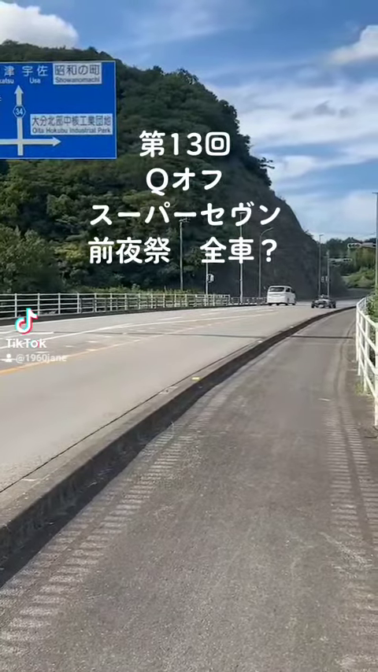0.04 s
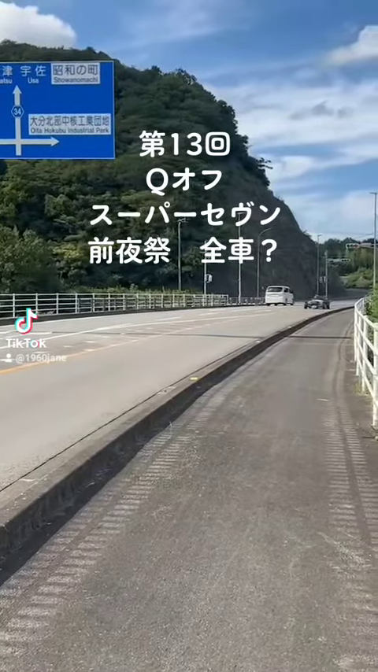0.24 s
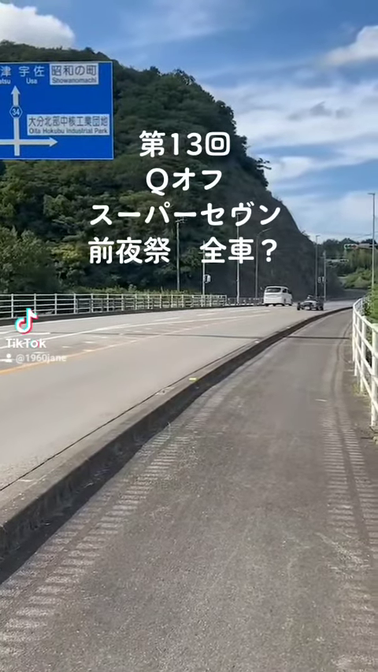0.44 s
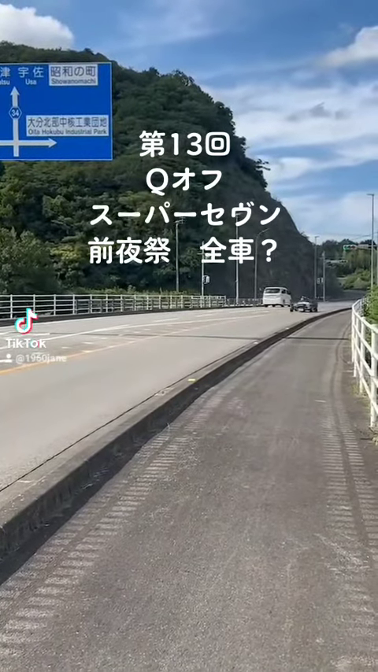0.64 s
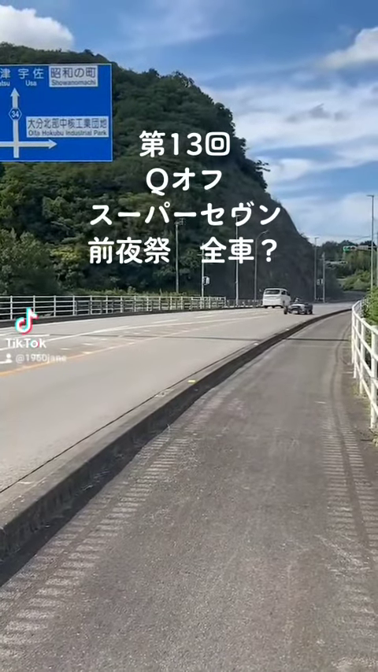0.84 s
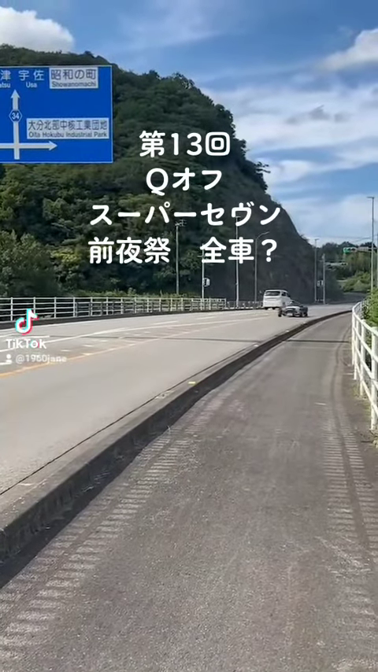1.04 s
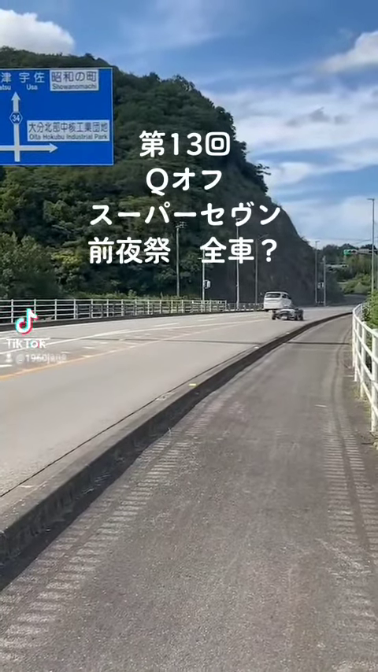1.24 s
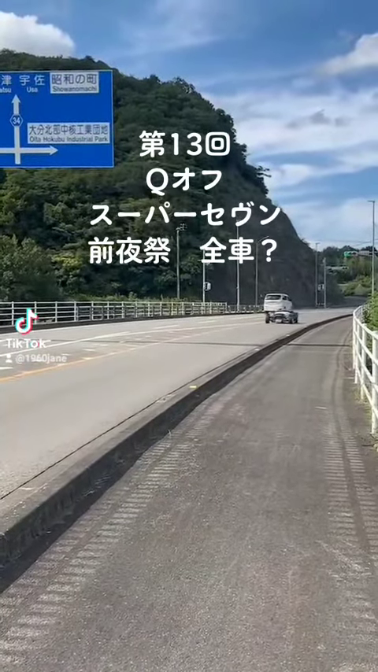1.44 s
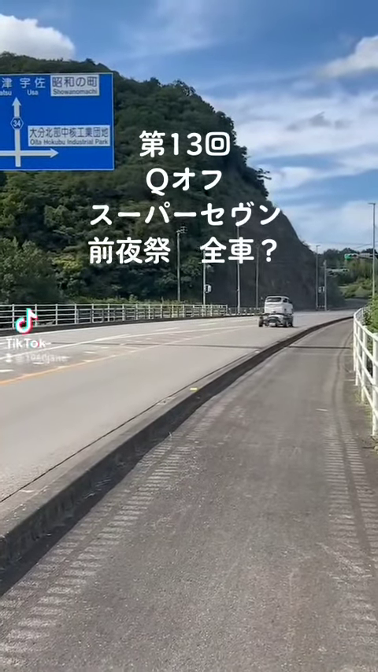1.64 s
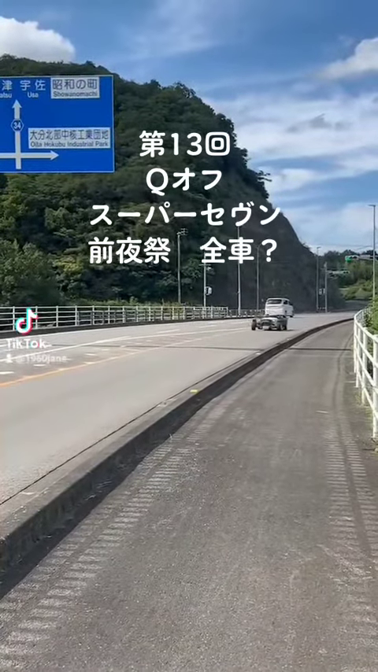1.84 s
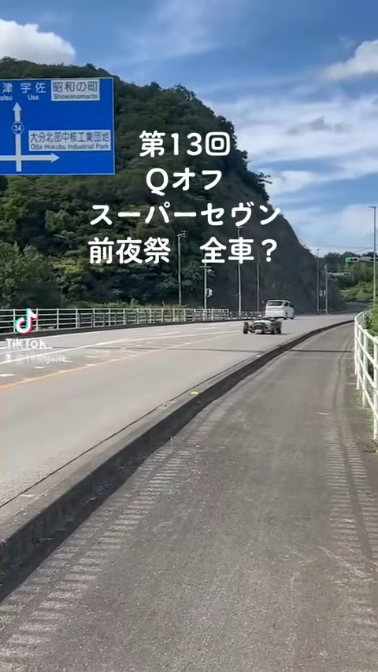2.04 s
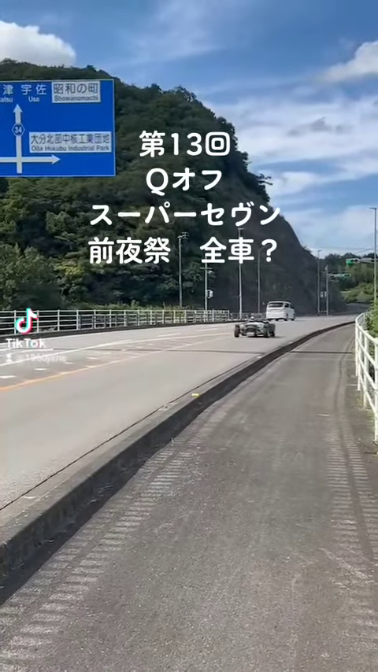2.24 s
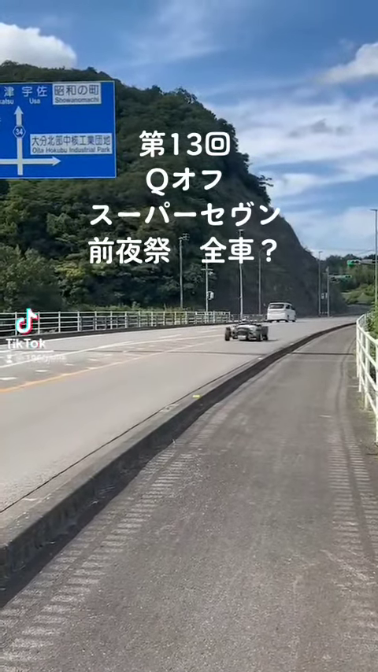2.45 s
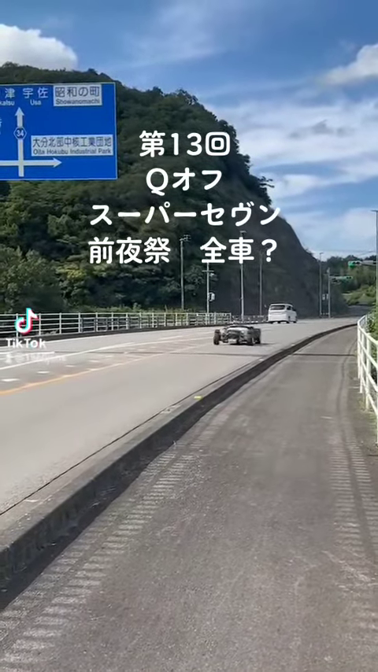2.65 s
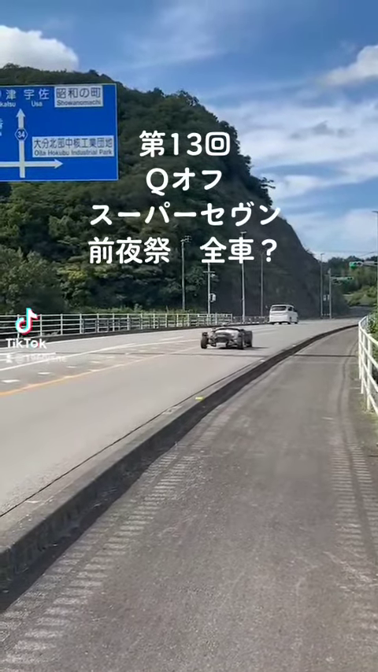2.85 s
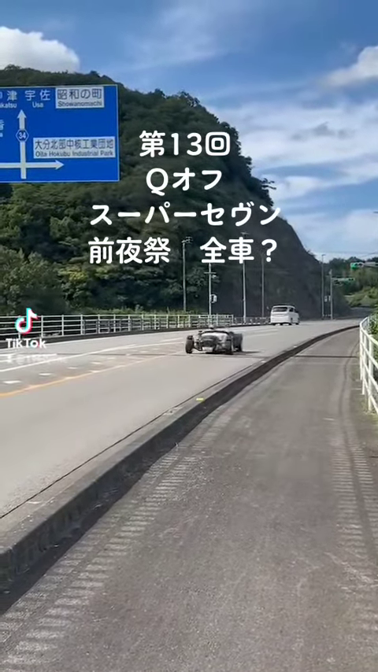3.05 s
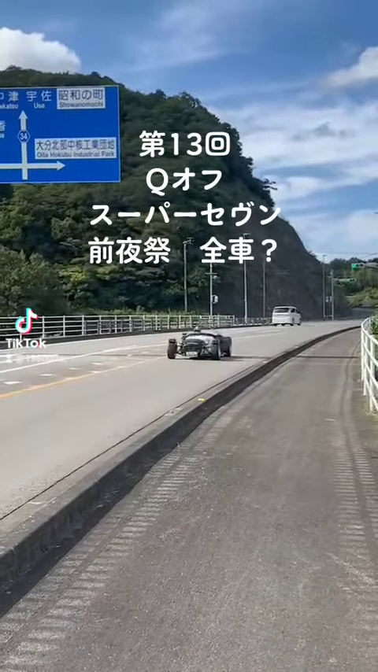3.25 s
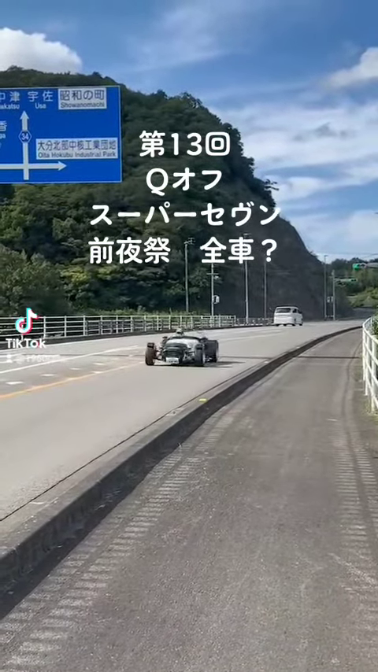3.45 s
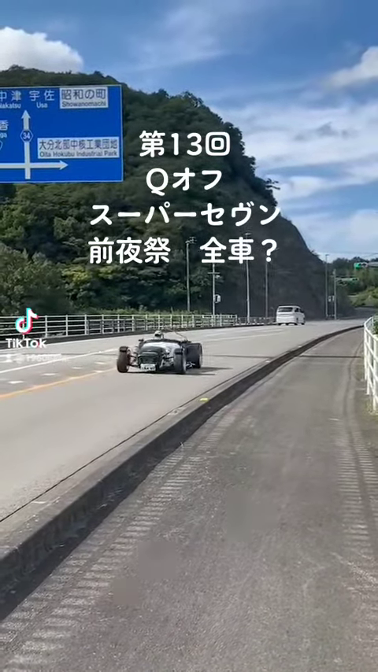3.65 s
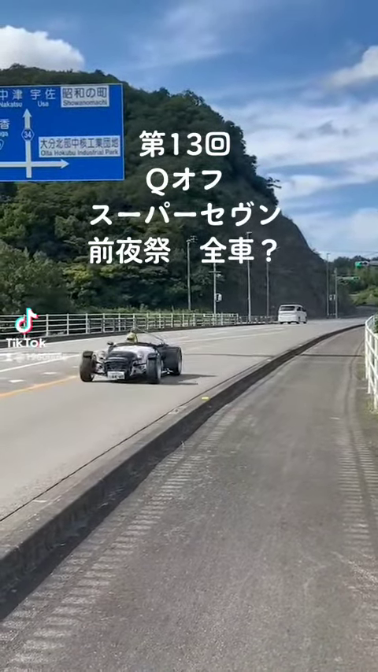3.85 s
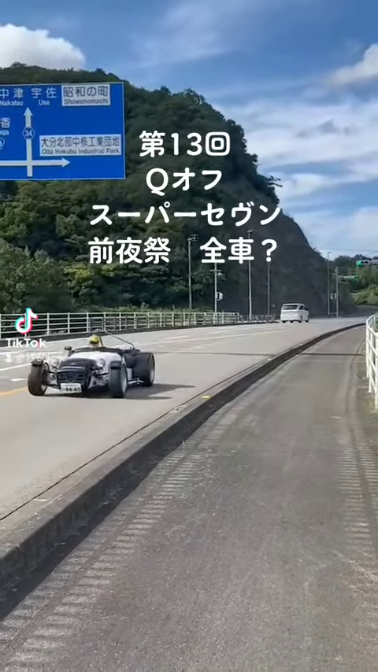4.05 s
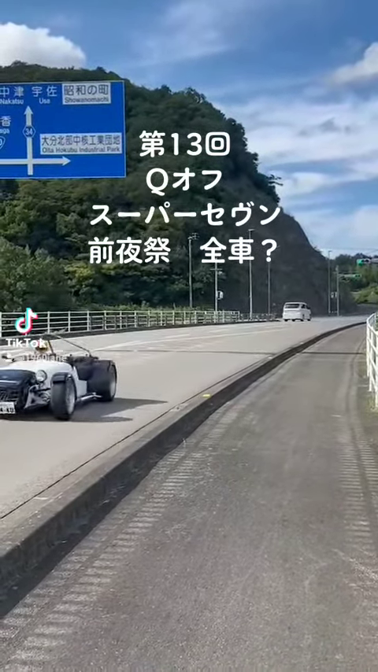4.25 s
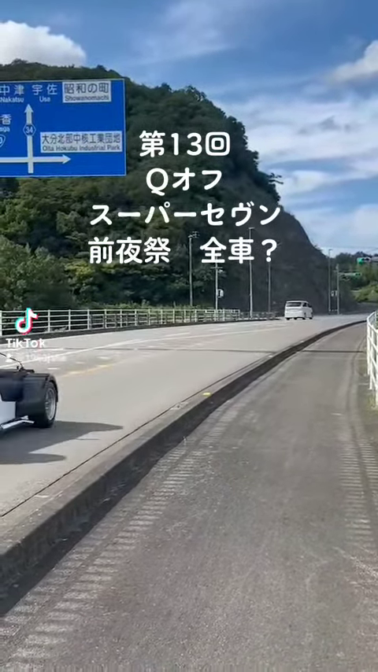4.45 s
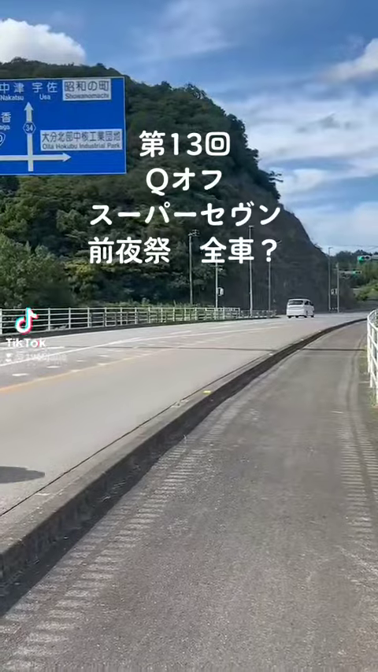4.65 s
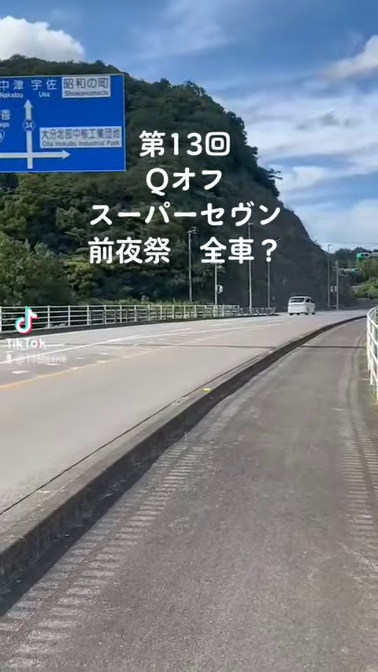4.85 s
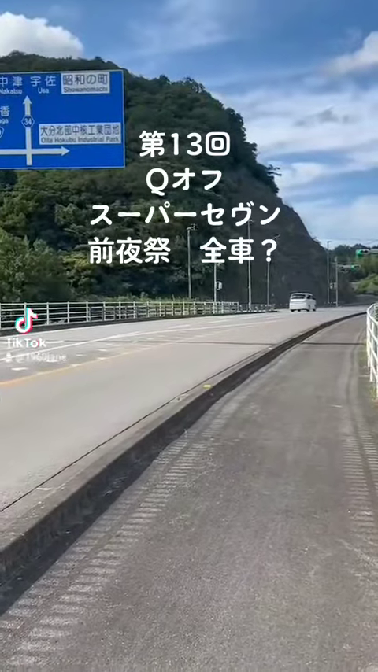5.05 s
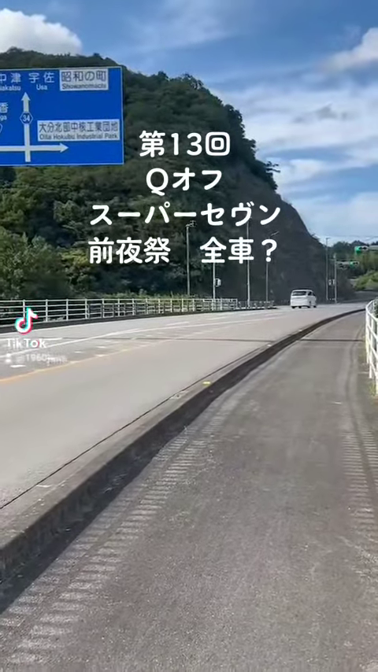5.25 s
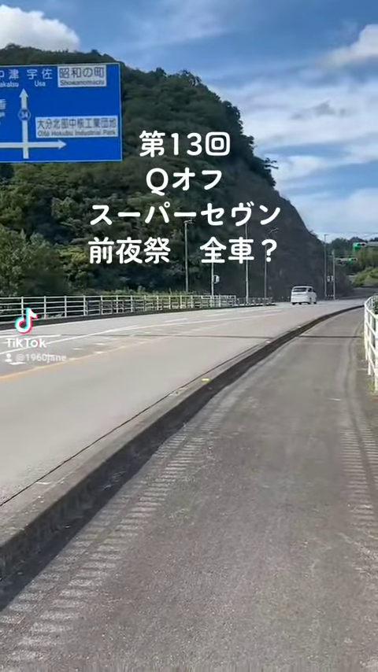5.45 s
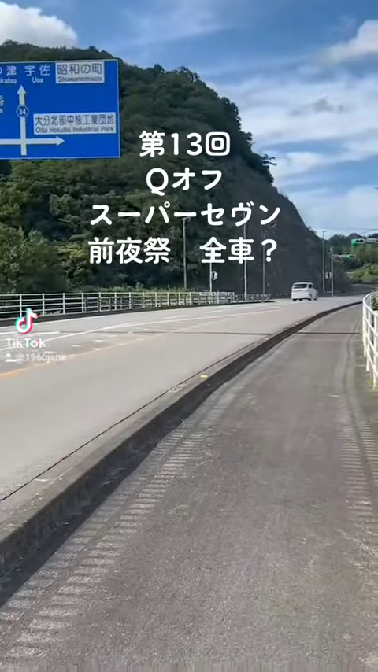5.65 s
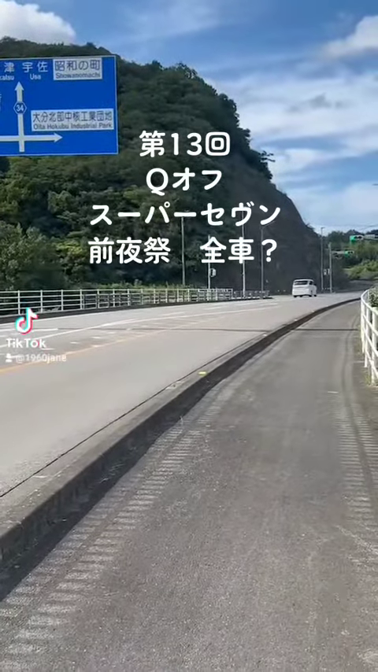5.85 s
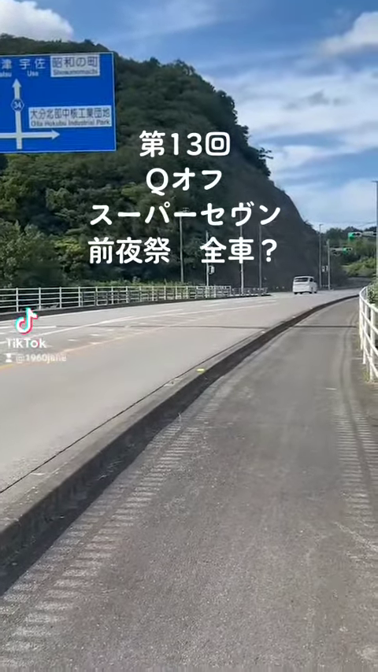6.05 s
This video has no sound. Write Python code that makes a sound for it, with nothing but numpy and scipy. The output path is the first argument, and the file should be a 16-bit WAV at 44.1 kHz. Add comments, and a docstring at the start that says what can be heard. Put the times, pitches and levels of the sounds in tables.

```python
"""Two sports cars boom away behind the listener, built from wavering partials of their firing rate.
Another open four-cylinder comes up through the gears and passes close on the left: sine firing orders,
noisy pulses rung through intake and side pipe, and coloured noise for tyres and air.
A bush cricket rasps in the verge of the country road as swelling noise; a bird, a gliding sine, calls once.
Far traffic hums below, and the tyres of cars gone by roar on the asphalt behind as wide noise."""
import sys
import numpy as np
from scipy import signal
from scipy.fft import rfft, irfft
from scipy.io import wavfile

SR = 44100
rng = np.random.default_rng(int(sys.argv[2]) if len(sys.argv) > 2 else 0)


def dump(signal):
    """Clip the signal to [-1, 1] and save it as 16-bit WAV at the path in sys.argv[1]."""
    limited = np.clip(np.atleast_2d(signal).T, -1, 1)
    pcm = np.round(limited * 32767).astype(np.int16)
    wavfile.write(sys.argv[1], SR, pcm)


N = 269010
TIME = np.arange(N) / SR
FREQS = np.maximum(np.fft.rfftfreq(N, 1 / SR), 1)
OPPOSED = np.array([[1], [-1]])  # left and right signs of a difference signal

# nearer car pulling away, one row per gear: start t/s, end t/s, start f/Hz, end f/Hz, boom level/dB
LEAVER_GEARS = [(0, 1.0, 68.6, 72.4, -19.7), (1.48, 3.6, 77.3, 94.5, -28.5), (3.75, 4.3, 71.3, 74, -30)]
# farther car, holding its speed, then lifting off: t/s, firing f/Hz, boom level/dB
FAR_LEAVER = [(0.0, 125.3, -21.5), (0.35, 126.7, -29), (1.05, 123.1, -31), (1.3, 109.7, -26),
              (1.7, 91.2, -37)]
# partials of each car pulling away: multiple of the firing rate, level/dB
LEAVER_PARTIALS = [(1, 0), (1.5, -17), (2, -17), (3, -22), (4, -30)]
FAR_LEAVER_PARTIALS = [(1, 0), (2, -20), (3, -33.5)]
SHIFT_S = 0.24  # longest wait from lifting off to the bottom of the dip

# cars gone by: t/s when their tyres peak from behind, level/dB, extra left-right difference level/dB
GONE_BY = [(-1.47, -39, 0), (5, -39.5, 2)]
# tyres heard from behind: f/Hz, relative level/dB per Hz
TYRES_BEHIND = [(260, -37), (450, 3), (559, -9), (637, -17), (682, -5.5), (893, -6.5), (957, -5.5),
                (1290, -1), (1840, -1), (2320, -6), (3580, -19.5), (4650, -31), (5600, -27), (6400, -35),
                (10000, -36), (13000, -47.5)]
TYRES_EMERGE_DB_PER_S, TYRES_RECEDE_S = 48.5, 0.49  # the latter is the time to lose 3 dB
# second arrival from a car going away: t/s, hollow f/Hz, strength 0-1
HOLLOW = [(0, 1045, 0), (4.95, 2510, 0.05), (5.17, 1750, 0.42), (5.28, 1290, 0.5), (5.42, 1070, 0.62),
          (5.6, 960, .5), (5.85, 880, 0.1), (6.1, 875, 0.02)]
# gain on the left-right difference at the microphones: f/Hz, level/dB
WIDTH = [(100, -51), (300, -4.5), (420, -3), (620, 5.5), (900, 1), (1350, -2.5), (1900, -12), (2400, -39)]
# hum of traffic far down the road: f/Hz, relative level/dB per Hz
TRAFFIC = [(25, -22.5), (45, -3), (65, 0.5), (90, 10.5), (130, -1), (300, -21.5), (600, -32)]

# oncoming car's path
ABREAST_S = 5.05
SPEED_M_PER_S, LANE_M, SOUND_M_PER_S = 14.37, 4.44, 343
TURN_M = 1.91  # softness of the point where a part turns away
# its revs as heard, climbing in gear and sagging between: t/s, firing f/Hz
REVS = [(0, 103.1), (.56, 113.1), (1.2, 92.27), (1.62, 87.58), (3.08, 104.8), (3.25, 99.43), (3.4, 88.98),
        (3.56, 74.47), (3.73, 63.47), (3.82, 84.6), (4.12, 86.07), (4.42, 88.07), (4.746, 90), (5.0, 90.8),
        (5.16, 88.67), (5.44, 86.17), (5.6, 87.6), (6.1, 87.8)]
# one pull on the throttle per gear: opens t/s, closes t/s, opening 0-1
PULLS = [(-.2, .545, 1.0), (1.67, 3.035, .95), (3.77, 6.3, .76)]
THROTTLE_OPENS_S, THROTTLE_CLOSES_S = 0.12, 0.19
REFERENCE_FIRING_HZ = 90  # revs at which the part levels below hold
# the clutch bites and the driveline rocks: the depth is before any decay
CLUTCH_S, SHUDDER_PER_S = 3.852, 7.4
SHUDDER_DEPTH_HZ, SHUDDER_DECAY_S = 6.5, 0.15

# Parts of the car share these columns: level/dB at lane distance (open throttle, facing the listener),
# ground loss level/dB per m, loss with throttle shut level/dB, rise per octave of revs level/dB,
# change once turned away level/dB, m past the listener where it turns
ORDERS_1_TO_5 = [(-2.5, 0.19, 9.5, 2.5, 2.5, 4.3), (-17.5, 1.03, 5, -6, 0, 7.8),
                 (-7, 0.18, 30.5, 11, -9, 1.2), (-12.5, 0.22, 20, 11, -27.5, 3.6),
                 (-19.5, 0.4, 24, -34.5, -27, 1.4)]
# unequal cylinders' lumpy beat at 1.5, 2.5 and 3.5 times the firing rate: part columns
HALF_ORDERS = [(-29.5, .2, 4, 0.0045, 1.5, 4), (-31, 0.2, 5.8, 0.00079, -14, 3),
               (-25, 0.31, 7.8, 0, -21, 1.5)]
# body rumble, intake growl and rasping orders five to nine: part columns
BODY_RUMBLE = (-21.5, -0.13, 0.5, 1.5, -6, 0.5)
INTAKE_GROWL = (-29, 0.27, 17, 4, -26.5, 1.5)
OVERTONES = (-38.5, 0, 23, 16, -22, 1.5)
# exhaust spilling outside its beam, tyre roar and rushing air: part columns
EXHAUST_SPILL = (-43.5, 0.1, 5, 9, -14, 5)
TYRE_ROAR = (-22, 0.2162, 1, -1, -22, 2.14)
AIR_RUSH = (-50, 0.48, 4.5, -0.5, -11, 2.5)
# swells and dips of the first five orders, one list per order: level/dB, m past the listener, m to half
ORDER_RIPPLES = [
    [(-6, -15, 0.98), (3.5, -9.5, 1.1), (0.5, 2, 1.8), (-2.5, 7, 0.68)],
    [(1, 1, 1.4)],
    [(3.5, 0.14, 1.8), (-9, 3, 1.1), (-3, 11, 0.74)],
    [(-13.5, -.9, 1.1)],
    [(5, -9, 3.7), (-10, -4, 0.52), (3.5, 2.7, 3.7)],
]
# sideways beams of exhaust and wheel arch: level/dB, m past the listener, m to fall by 6 dB
EXHAUST_BEAM = (-27.5, 0.21, 2.9)
WHEEL_ARCH_BEAM = (-47.5, -0.51, 2.4)
# beams of the side pipe's seventh and eighth orders: level/dB, m past the listener, m to fall by 6 dB
PIPE_TONES = [(-31, -1.1, 2.6), (-36, 1.7, 2.2)]
# tyre wedge throwing tread sizzle forward: gain level/dB, m past the listener, m to half the dB gain
TREAD_HORN = (6.9, -12, 6.4)

# intake and upper side-pipe resonances: f/Hz, width f/Hz, level/dB
AIRBOX = [(640, 110, 5), (724, 60, 10.5), (798, 80, 6), (1400, 300, -4.5), (2290, 450, -14.5)]
PIPE = [(525, 130, -1.5), (617, 79, 1.5), (700, 64, 2), (860, 130, -2), (962, 130, 0.5), (1420, 100, -15),
        (2680, 140, -27)]
# intake colour on the fifth to ninth orders: f/Hz, level/dB
OVERTONE_COLOUR = [(430, 1), (455, 11), (478, 10), (515, -7), (555, -1), (600, -6), (650, -2), (700, -5),
                   (755, 0), (820, -5), (900, -14)]
# noise of body, tyres, tread blocks and air: f/Hz, relative level/dB per Hz
RUMBLE = [(28, -29), (42, -2.5), (65, 1), (110, 4), (155, -5.5), (220, -6.5), (320, -10), (450, -27.5),
          (700, -35)]
TYRES = [(380, -7), (520, -8), (700, -12.5), (880, -14), (1170, -10.5), (1430, -10.5), (1840, -19.5),
         (2250, -21.5), (3000, -28), (3700, -31), (4500, -39), (5600, -43.5), (6300, -58)]
TREAD = [(1500, -9.5), (2000, 2.5), (2500, -2), (3100, -10.5), (4000, -26.5)]
HISS = [(3000, -17.5), (4300, -1), (5200, -10), (6200, -7.5), (7000, -3.5), (8300, -6), (11000, -7),
        (12500, -15.5), (14000, -22)]
# oncoming car's lean: t/s, side-to-mid level/dB in the middle band
SWING = [(0, -13.5), (3.7, -22), (4.85, -24.5), (5.14, -8), (5.35, 0), (6.1, -13.5)]
CROSSES_S, CROSSING_S = 4.58, 0.14  # from right of centre to the left
# phase of the left-right difference; the nearer microphone leads in the bass: f/Hz, phase/rad
PORT_PHASE = [(300, 1.15), (430, 1.0), (620, .35), (1400, .2)]
# left-right difference of the treble: f/Hz, side-to-mid level/dB
TREBLE_WIDTH = [(6200, -21), (8000, -9), (10000, -0.5), (12500, 10.5)]

# cricket and verge hush: f/Hz, relative level/dB per Hz
CRICKET = [(8500, -37.5), (10300, -13.5), (11700, -0.5), (13000, -15.5), (14500, -22)]
VERGE = [(300, 16), (2000, 12.5), (5000, -2.5), (8000, -7), (11500, -7), (13000, -11), (14500, -25.5)]
# the cricket's pace: t/s, time between chirps t/s
CHIRP_PERIOD = [(0, .21), (1.3, .212), (1.9, .233), (3, .23), (4.2, .259), (6.1, .21)]
FIRST_CHIRP_S = 0.08
# one bird call: t/s, pitch f/Hz, level/dB
BIRD = [(1.285, 2254, -75), (1.305, 2320, -59), (1.316, 2400, -64), (1.332, 2450, -56), (1.345, 2490, -60),
        (1.36, 2470, -49.5), (1.385, 2410, -53), (1.4, 2390, -70)]

# intake snarl near the top of second gear: start t/s, end t/s
SNARL = (2.74, 3.05)
SNARL_DB = -43.5
# exhaust boom as the engine slows with the throttle shut: start t/s, end t/s
OVERRUN = (3.12, 3.6)
OVERRUN_DB, OVERRUN_BURBLE_DB = 9.5, 2.5
# hard single firings: t/s, onset level/dB
CRACKS = [(4.886, -24), (4.929, -23.5), (4.945, -21), (5.081, -21), (5.107, -21.5), (5.123, -24)]
# colour of such a firing: f/Hz, relative level/dB per Hz
CRACK_COLOUR = [(520, 0), (1300, -4), (2200, -16)]
# short blares of the side exhaust: start t/s, length t/s, pitch f/Hz, level/dB
BLARES = [(4.93, .015, 812, -22.5), (4.984, 0.049, 638.4, -19), (5.079, .055, 632, -27.5),
          (5.135, .04, 605, -27), (5.247, 0.02, 585, -29)]
# partials of a blare: multiple of its pitch, level/dB
BLARE_PARTIALS = [(1, -1), (1.48, -9.5), (2.05, -15)]

# band reaching the two microphone ports in opposite phase, and where the treble is fully cut
PORT_HZ, PORT_WIDTH_HZ, TREBLE_STOP_HZ = 5020, 230, 15000


def from_db(db):
    """Decibels to amplitude."""
    return 10 ** (np.asarray(db) / 20)


def rms_one(x):
    """Scale to rms 1."""
    return x / np.sqrt(np.mean(x ** 2) + 1e-20)


def in_time(rows):
    """Each column of a table as a curve in time."""
    s, *columns = np.transpose(rows)
    return [np.interp(TIME, s, column) for column in columns]


def colour(x, points, closed=True):
    """Filter by a spectrum; closed ends fall away steeply."""
    hz, db = np.transpose(points)
    gain = from_db(np.interp(np.log(FREQS), np.log(hz), db))
    if closed:
        gain = gain * np.minimum(1, FREQS / hz[0]) ** 4 * np.minimum(1, hz[-1] / FREQS) ** 4
    return irfft(rfft(x) * gain, N)


def noise(points):
    """Noise of a given spectrum, rms 1."""
    return rms_one(colour(rng.standard_normal(N), points))


def drift(rate_hz):
    """Random wander of spread 1: noise through two equal low-pass poles, run every 40 samples."""
    r = np.exp(-80 * np.pi * rate_hz / SR)
    chance = rng.standard_normal(N // 40 + 2002)
    slow = signal.lfilter([1], [1, -2 * r, r * r], chance)[2000:]  # skip the settling
    return np.interp(np.arange(N) / 40, np.arange(len(slow)), rms_one(slow))


def resonate(x, hz, width_hz):
    """One resonance, gain 1 on top."""
    r = np.exp(-np.pi * width_hz / SR)
    zeros = np.array([1, 0, -1]) * (1 - r * r) / 2
    return signal.lfilter(zeros, [1, -2 * r * np.cos(2 * np.pi * hz / SR), r * r], x)


def gate(start, end, attack_s, release_s):
    """Rises from start, holds at 1, falls from end."""
    return np.clip(np.minimum((TIME - start) / attack_s, 1 - (TIME - end) / release_s), 0, 1)


def firings(hz, wobble):
    """Count of firings so far; the crank speed wavers a little."""
    return np.cumsum(hz * (1 + wobble * drift(10.85))) / SR


def through_gears(gears):
    """Revs climb evenly in each gear and the boom dips during each shift: rows of t/s, f/Hz, level/dB."""
    rows = []
    for start, end, start_hz, end_hz, db in gears:
        if rows:
            lifted, _, lifted_db = rows[-1]
            dip_s = min(lifted + SHIFT_S, (lifted + start) / 2)
            rows.append((dip_s, start_hz * 0.8, min(db, lifted_db - 3) - 10))
        rows += [(start, start_hz, db), (end, end_hz, db)]
    return rows


def leaving_car(rows, partials, wobble, flutter_db):
    """From behind and far off, an exhaust is a wavering boom with faint overtones."""
    hz, db = in_time(rows)
    turns = firings(hz, wobble)
    fading_db = -60 * np.maximum(TIME - rows[-1][0], 0)  # 60 dB per s after the last row
    orders = 0
    for k, level in partials:
        gain = from_db(level + flutter_db * drift(5.4))
        orders = orders + gain * np.sin(2 * np.pi * (k * turns + rng.random()))
    return from_db(db + fading_db) * orders


def hollowed(x):
    """A duller second arrival half a period late cancels one band and lifts the octave above it."""
    hz, strength = in_time(HOLLOW)
    dull = colour(x, [(1900, 0), (2500, -6), (3100, -20)], closed=False)
    late = np.interp(TIME - 0.5 / hz, TIME, dull)
    return (x + strength * late) / np.sqrt(1 + strength ** 2)


def receding_tyres(lean, spread):
    """Tyre noise behind emerges as each car goes by and fades with distance, wide and leaning right."""
    out = 0
    for s, db, side_db in GONE_BY:
        emerging = from_db(db + TYRES_EMERGE_DB_PER_S * np.minimum(TIME - s, 0))
        gain = emerging / np.hypot(1, np.maximum(TIME - s, 0) / TYRES_RECEDE_S)
        mid = noise(TYRES_BEHIND)
        side = from_db(side_db) * colour(spread * noise(TYRES_BEHIND) - lean * mid, WIDTH)
        out = out + gain * from_db(1.5 * drift(22)) * (hollowed(mid) + OPPOSED * side)
    return out


def far_traffic(db):
    """Many distant engines and tyres merge into a steady low hum of noise."""
    return from_db(db) * noise(TRAFFIC)


def metres_past():
    """Place of the oncoming car along the road; negative while it is still ahead."""
    return SPEED_M_PER_S * (TIME - ABREAST_S)


def sweep(centre_m, width_m):
    """Bell curve over a stretch of the car's path."""
    return 0.5 ** np.minimum(((metres_past() - centre_m) / width_m) ** 2, 20)


def beamed(beam):
    """Gain of a sideways beam as it sweeps past."""
    return from_db(beam[0]) * sweep(*beam[1:])


def radiated_db(part):
    """Level of one part of the car: set by distance, throttle, engine speed and which way it faces."""
    db, ground_loss, shut_db, rev_db, behind_db, turn_m = part
    along = metres_past()
    distance = np.hypot(along, LANE_M)
    throttle = sum(opening * gate(start, end, THROTTLE_OPENS_S, THROTTLE_CLOSES_S)
                   for start, end, opening in PULLS)
    effort_db = rev_db * np.log2(in_time(REVS)[0] / REFERENCE_FIRING_HZ) - shut_db * (1 - throttle)
    travel_db = 20 * np.log10(LANE_M / distance) - ground_loss * (distance - LANE_M)
    turned = 0.5 + 0.5 * np.tanh((along - turn_m) / (2 * TURN_M))
    return db + effort_db + travel_db + behind_db * turned


def firing_hz():
    """Heard firing rate, with the dying driveline shudder after the last gear change."""
    since = np.maximum(TIME - CLUTCH_S, 0)
    shudder = np.exp(-since / SHUDDER_DECAY_S) * np.sin(2 * np.pi * SHUDDER_PER_S * since)
    return in_time(REVS)[0] + SHUDDER_DEPTH_HZ * shudder


def exhaust_note(turns, order_dbs, flutter_db, half_flutter_db):
    """Clean firing orders all start with the pulse; unequal cylinders put weak half orders between them."""
    out = 0
    for k, db in enumerate(order_dbs, 1):
        out = out + from_db(db + flutter_db * drift(1.3)) * np.sin(2 * np.pi * k * turns)
    for k, part in enumerate(HALF_ORDERS, 1):
        gain = from_db(radiated_db(part) + half_flutter_db * drift(5.5))
        out = out + gain * np.sin(2 * np.pi * ((k + 0.5) * turns + rng.random()))
    return out


def engine_boom(turns):
    """Low firing orders ripple along the road, and swell on the overrun, over a rumble of the body."""
    order_dbs = []
    for order, ripples in zip(ORDERS_1_TO_5, ORDER_RIPPLES):
        ripple_db = sum(db * sweep(at_m, half_m) for db, at_m, half_m in ripples)
        order_dbs.append(radiated_db(order) + ripple_db)
    overrun_db = OVERRUN_DB + OVERRUN_BURBLE_DB * drift(22)
    order_dbs[0] = order_dbs[0] + overrun_db * gate(*OVERRUN, attack_s=0.23, release_s=0.15)
    note = exhaust_note(turns, order_dbs, flutter_db=0.5, half_flutter_db=2.5)
    return note + from_db(radiated_db(BODY_RUMBLE)) * noise(RUMBLE)


def rasp(turns, resonances, scatter_db, gas, sharpness):
    """Each firing sends a pulse and a puff of turbulent gas through a duct's resonances."""
    pulses = np.diff(np.floor(turns), prepend=0) * from_db(scatter_db * drift(55))
    puffs = np.exp(-sharpness * (turns % 1)) * rng.standard_normal(N)
    drive = rms_one(pulses) + gas * rms_one(puffs)
    duct = 0
    for k, (hz, width_hz, db) in enumerate(resonances):
        duct = duct + (-1) ** k * from_db(db) * resonate(drive, hz, width_hz)
    band = signal.butter(2, [480, 3500], "band", fs=SR, output="sos")
    return rms_one(signal.sosfilt(band, duct))


def scattered(x, spread_s):
    """Road, kerb and guard rail return a spray of short echoes that blur the pulses."""
    lags = (rng.random(6) * spread_s * SR).astype(int)
    return rms_one(x + sum(0.2 * rng.choice([-1, 1]) * np.roll(x, lag) for lag in lags))


def overtones(turns, flutter_db):
    """Upper firing orders swell and fade as the revs carry them through the intake's resonances."""
    hz = firing_hz()
    colour_hz, colour_db = np.transpose(OVERTONE_COLOUR)
    orders = 0
    for k in range(5, 10):
        db = np.interp(k * hz, colour_hz, colour_db) + flutter_db * drift(12)
        orders = orders + from_db(db) * np.sin(2 * np.pi * k * turns)
    return from_db(radiated_db(OVERTONES)) * orders


def intake(turns):
    """Firing pulses growl through the airbox and break into a brief snarl, with tonal upper orders."""
    growl = rasp(turns, AIRBOX, scatter_db=2.5, gas=1.0, sharpness=2.5)
    snarl = from_db(SNARL_DB) * gate(*SNARL, attack_s=0.19, release_s=0.2)
    gain = np.hypot(from_db(radiated_db(INTAKE_GROWL)), snarl)
    return gain * scattered(growl, spread_s=0.02) + overtones(turns, flutter_db=2.0)


def tyre_roar(db, tread_db, air_loss):
    """Tyre roar; the tread's sizzle carries forward, but fades faster with distance than the roar."""
    horn_db = TREAD_HORN[0] * sweep(*TREAD_HORN[1:])
    tread = from_db(tread_db + horn_db + air_loss * (db - db.max())) * noise(TREAD)
    return from_db(db + 0.5 * drift(21)) * (noise(TYRES) + tread)


def exhaust_bark(turns):
    """Coarse pulses through the side pipe, whose resonances drop in pitch as the car goes by."""
    along = metres_past()
    closing = SPEED_M_PER_S / SOUND_M_PER_S * along / np.hypot(along, LANE_M)
    clock = np.cumsum(1 / (1 + closing)) / SR  # time at the car, for the Doppler shift
    clock = clock - clock[-1] + TIME[-1]
    turns_at_car = np.interp(TIME, clock, turns)
    at_car = rasp(turns_at_car, PIPE, scatter_db=2.5, gas=0.65, sharpness=1.3)
    gain = beamed(EXHAUST_BEAM) + from_db(radiated_db(EXHAUST_SPILL))
    return gain * np.interp(clock, TIME, at_car)


def swung(x):
    """Left-right difference of the oncoming car as it crosses from right of centre to the left side."""
    lean = from_db(in_time(SWING)[0]) * np.tanh((TIME - CROSSES_S) / CROSSING_S)
    phase = np.interp(FREQS, *np.transpose(PORT_PHASE))
    return colour(irfft(rfft(x * lean) * np.exp(1j * phase), N), WIDTH)


def oncoming_car():
    """Engine, pipe and tyres sit just right of centre ahead, then swing left; rushing air stays wide."""
    turns = firings(firing_hz(), wobble=0.002)
    boom = engine_boom(turns)
    pipe = exhaust_bark(turns) + pipe_tones(turns, flutter_db=2.5)
    pipe = pipe + cracks(decay_s=0.004) + blares(waver=0.01, attack_s=0.008, release_s=0.015)
    tyres = tyre_roar(radiated_db(TYRE_ROAR), tread_db=-10.0, air_loss=0.45)
    roar = pipe + intake(turns) + tyres
    air = np.hypot(from_db(radiated_db(AIR_RUSH)), beamed(WHEEL_ARCH_BEAM)) * from_db(drift(30))
    side = swung(boom + roar) + air * colour(noise(HISS), TREBLE_WIDTH, closed=False)
    return boom + hollowed(roar) + air * noise(HISS) + OPPOSED * side


def verge(cricket_db, swell_s, fall_s, floor_db, hush_db, side_db):
    """A bush cricket's high, grainy noise swells and falls unevenly over a faint rasp; a hush of leaves."""
    period, = in_time(CHIRP_PERIOD)
    cycles = np.cumsum(1 / period) / SR - FIRST_CHIRP_S / period[0]
    since = (cycles - np.round(cycles)) * period + 0.005 * drift(4)  # s from the nearest chirp's peak
    stroke = np.exp(-(since / np.where(since < 0, swell_s, fall_s)) ** 2)
    chirps = (stroke + from_db(floor_db)) * from_db(3.3 * drift(30) + 1.2 * drift(3))
    grain = noise(CRICKET) + OPPOSED * from_db(side_db) * noise(CRICKET)
    hush = noise(VERGE) + OPPOSED * colour(noise(VERGE), TREBLE_WIDTH, closed=False)
    return from_db(cricket_db) * chirps * grain + from_db(hush_db) * hush


def bird(echo_db, echo_peak_s):
    """A broken, trembling whistle; the wooded slope returns it as a trail that swells and dies."""
    hz, db = in_time(BIRD)
    calling = (TIME > BIRD[0][0]) * (TIME < BIRD[-1][0])
    call = from_db(db + 2 * drift(60)) * calling * np.sin(2 * np.pi * np.cumsum(hz) / SR)
    slope = rng.standard_normal((2, SR)) * TIME[:SR] * np.exp(-TIME[:SR] / echo_peak_s)
    slope = slope / np.sqrt(np.sum(slope[0] ** 2))
    echo = signal.fftconvolve(call[None], slope, axes=1)[:, :N]
    return call + from_db(echo_db) * echo


def pipe_tones(turns, flutter_db):
    """The side pipe sings two clean upper orders in its beams; they follow the heard firing rate."""
    out = 0
    for k, beam in enumerate(PIPE_TONES, 7):
        out = out + beamed(beam) * from_db(flutter_db * drift(15)) * np.sin(2 * np.pi * k * turns)
    return out


def cracks(decay_s):
    """Each hard firing is a short puff of gas, dulled by the pipe."""
    puffs = sum(from_db(db) * (TIME >= s) * np.exp(-np.abs(TIME - s) / decay_s) for s, db in CRACKS)
    gas = rng.standard_normal(N)
    return colour(puffs * gas, CRACK_COLOUR) / np.std(colour(gas, CRACK_COLOUR))


def blares(waver, attack_s, release_s):
    """The pipe's ring catches suddenly, holds a moment and lets go."""
    out = 0
    for start, length, hz, db in BLARES:
        ring = 0
        for k, level in BLARE_PARTIALS:
            cycles = np.cumsum(k * hz * (1 + waver * drift(40))) / SR
            ring = ring + from_db(level) * np.sin(2 * np.pi * cycles)
        out = out + from_db(db) * gate(start, start + length, attack_s, release_s) * ring
    return out


def scene():
    """Three cars, tyres behind and far traffic, with the roadside's own small sounds."""
    nearer = leaving_car(through_gears(LEAVER_GEARS), LEAVER_PARTIALS, wobble=0.006, flutter_db=2.6)
    farther = leaving_car(FAR_LEAVER, FAR_LEAVER_PARTIALS, wobble=0.006, flutter_db=2.8)
    behind = nearer + farther + receding_tyres(lean=1.0, spread=0.85) + far_traffic(db=-37.5)
    roadside = verge(cricket_db=-73.3, swell_s=0.04, fall_s=0.038, floor_db=-22, hush_db=-69, side_db=5.5)
    return behind + oncoming_car() + roadside + bird(echo_db=-2, echo_peak_s=0.07)


def record(dry):
    """One narrow band turns from sum to difference at the ports; high peaks are rounded; the top is cut."""
    port_band = resonate(dry.mean(axis=0), PORT_HZ, PORT_WIDTH_HZ)
    heard = dry + (OPPOSED - 1) * port_band
    rounded = heard / (1 + np.abs(heard) ** 12) ** (1 / 12)
    top_cut = signal.cheby2(12, 70, TREBLE_STOP_HZ, fs=SR, output="sos")
    return signal.sosfilt(top_cut, rounded)


dry = scene()
out = record(dry)
dump(out)
```